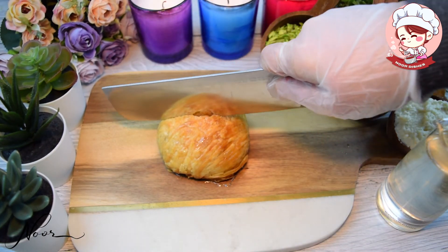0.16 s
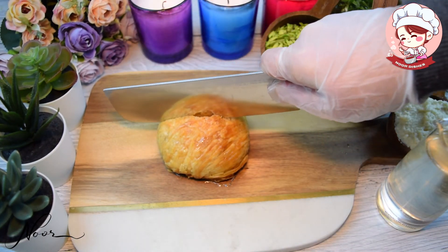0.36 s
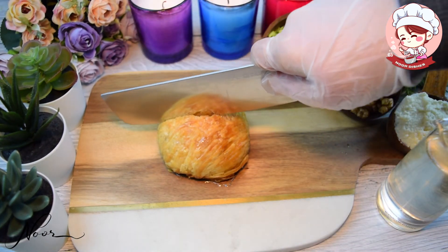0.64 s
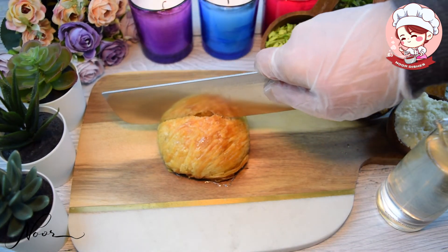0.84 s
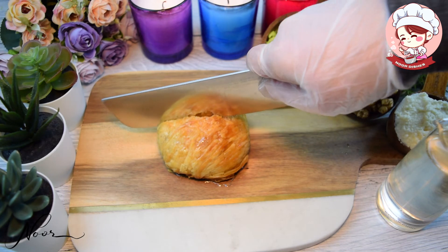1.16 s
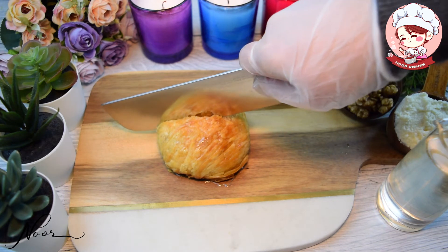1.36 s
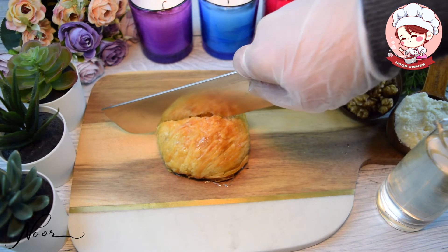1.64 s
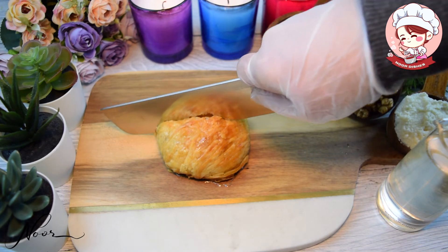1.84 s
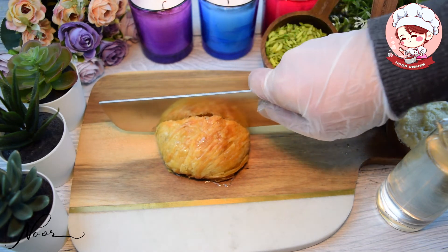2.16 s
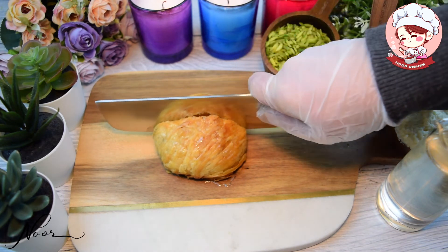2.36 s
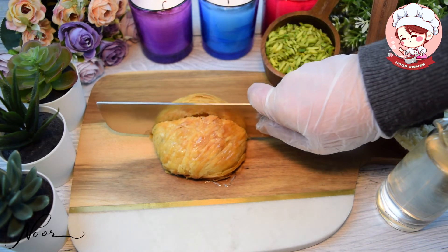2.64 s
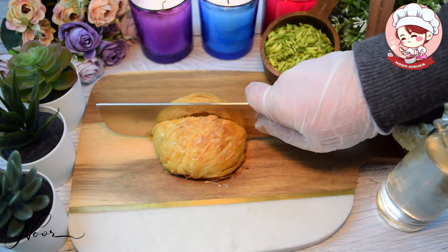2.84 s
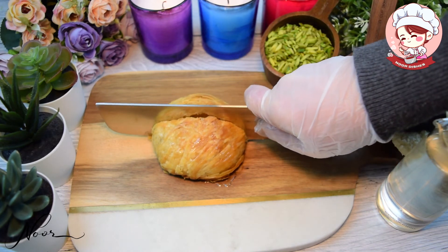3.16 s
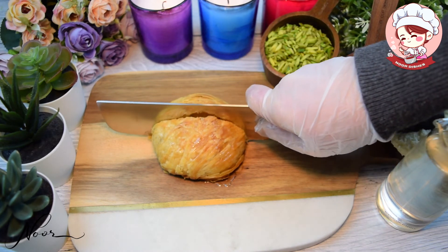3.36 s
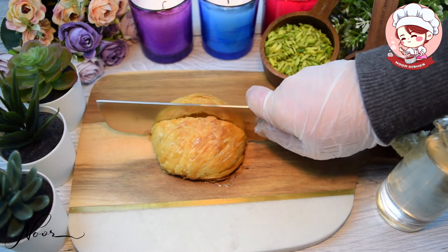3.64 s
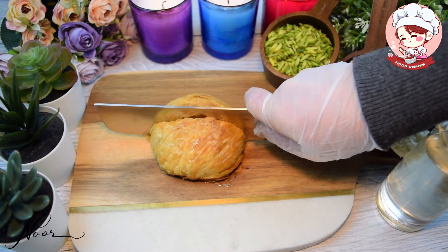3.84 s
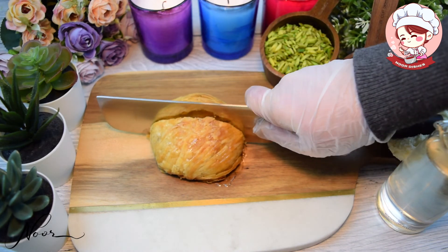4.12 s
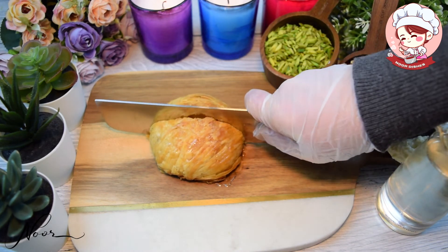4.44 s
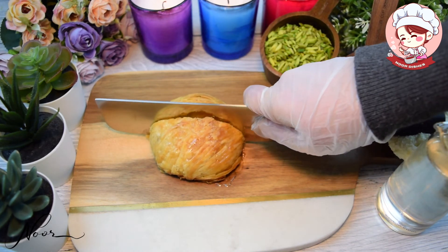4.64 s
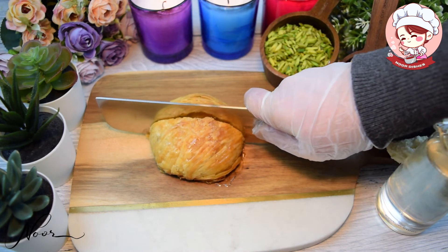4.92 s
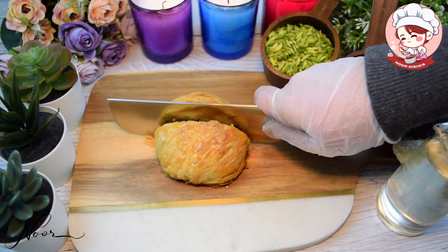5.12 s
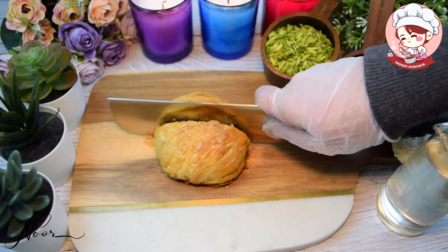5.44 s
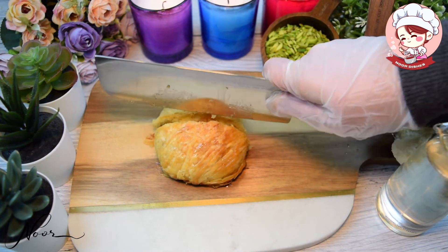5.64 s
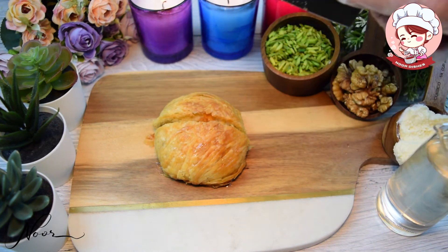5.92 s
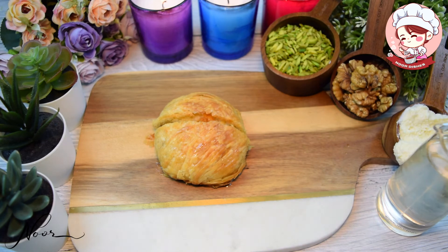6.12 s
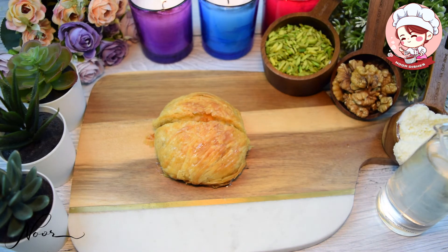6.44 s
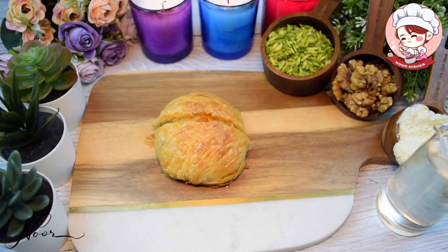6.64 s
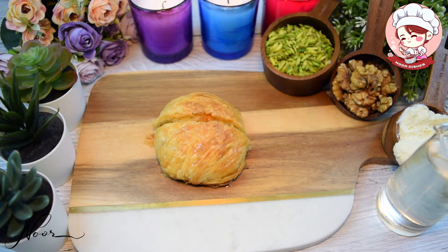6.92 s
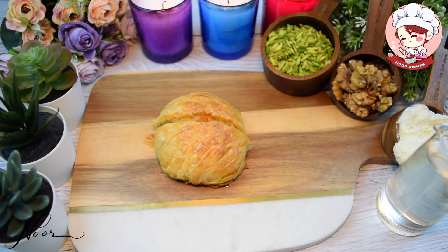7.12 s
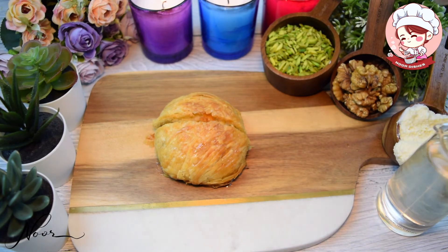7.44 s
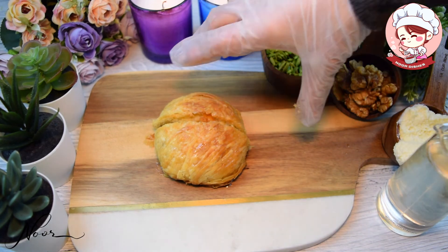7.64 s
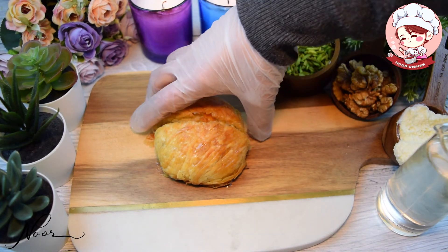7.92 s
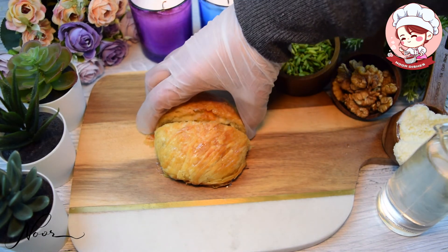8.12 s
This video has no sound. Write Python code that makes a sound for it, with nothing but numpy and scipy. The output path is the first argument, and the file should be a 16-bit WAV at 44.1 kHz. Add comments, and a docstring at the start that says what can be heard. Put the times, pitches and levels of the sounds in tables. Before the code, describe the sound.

Close up in a quiet kitchen, a blade works through flaky pastry: faint crackles grow into a dense crunch with sharp snaps, then soft rubbing through the filling. Several woody knocks hit the board, two of them strong. The knife is then set down with a loud thud and bright steel ring, followed by faint glove rustle and tiny crust ticks.

```python
"""A large knife is pressed through a flaky, nut-filled pastry on a wooden board in a quiet kitchen.
The crust crackles as clumped random fractures, single flakes snap as short noise cracks, and the blade
rubs through the filling as uneven coloured noise. Knocks on the board and the clink and thud of the knife
being laid down are sums of decaying modes; a gloved hand then brushes along as it takes hold of the pastry.
Room reflections, room tone, a faint hum and a thin high whine lie behind."""
import sys
import numpy as np
from scipy import signal
from scipy.fft import rfft, irfft, next_fast_len
from scipy.io import wavfile

SR = 44100
rng = np.random.default_rng(int(sys.argv[2]) if len(sys.argv) > 2 else 0)


def dump_mix(stems):
    """Bounce the given channels to the path in sys.argv[1] as a 16-bit WAV at rate SR."""
    frames = np.atleast_2d(stems).T  # one column per channel
    limited = np.clip(frames, -1, 1)  # hard clip at full scale
    pcm = np.round(limited * 32767).astype(np.int16)
    wavfile.write(sys.argv[1], SR, pcm)


N = 365148
TIME = np.arange(N) / SR


# pushes of the blade through the crust:
# (start [s], length [s], crackle of fine flakes [dB], crunch of coarse layers [dB])
CRUST_PUSHES = [(0.329, 0.089, -66.5, -74), (0.678, 0.26, -74, -70), (0.96, 0.34, -80.5, -100),
                (1.436, 0.36, -73, -70.5), (1.875, 0.1, -67, -59), (2.018, 0.074, -78, -60),
                (2.136, 0.14, -75.5, -64.5), (2.281, 0.11, -73, -58.5), (2.486, 0.062, -58.5, -54),
                (2.593, 0.047, -60.5, -51.5), (2.873, 0.01, -61, -58), (3.418, 0.0098, -90, -62.5),
                (3.663, 0.11, -76, -72), (4.02, 0.29, -89, -71), (4.557, 0.018, -90, -64.5),
                (4.94, 0.2, -79.5, -75.5), (5.567, 0.065, -68, -78), (5.766, 0.066, -94, -56)]
PUSH_ATTACK_S, PUSH_RELEASE_S = 0.017, 0.028   # time constants
RESTING_CRACKLE_DB = -84   # flakes giving way under the weight of the blade


def breaking():
    """Fracture follows load: the strengths of flaking and crunching swell, hold and let go with each push."""
    pushes = 0
    for start, length, fine_db, coarse_db in CRUST_PUSHES:
        strength = from_db([[fine_db], [coarse_db]])
        pushes = pushes + strength * swell(start, length, PUSH_ATTACK_S, PUSH_RELEASE_S)
    return pushes + from_db(RESTING_CRACKLE_DB) * in_pastry()


KNIFE_OUT_S, KNIFE_OUT_RELEASE_S = 5.91, 0.11   # the blade leaves the pastry; time constant


def in_pastry():
    """Contact condition: 1 while the blade is in the pastry, decaying exponentially as it is drawn out."""
    return np.exp(-np.maximum(TIME - KNIFE_OUT_S, 0) / KNIFE_OUT_RELEASE_S)


# stereo width of sounds on the board: (frequency [Hz], side minus mid [dB])
CLOSE_WIDTH = [(100, -56), (400, -21), (900, -23), (2000, -20), (4000, -19), (8000, -2.5), (15000, -7)]


def grains(spectrum, per_s, size_db, clump_db):
    """Crackling noise: a random train of microfractures of random size, in clumps; stereo, rms 1."""
    born = rng.random(N) < per_s / SR
    magnitude = np.minimum(rng.exponential(1, N), 4)
    sizes = born * from_db(size_db * magnitude + clump_db * drift(160))
    impulses = sizes * rng.choice([-1, 1], (2, N))
    return rms_one(stereo(*colour(impulses, spectrum), CLOSE_WIDTH))


# spectrum of the thin outer flakes: (frequency [Hz], relative level [dB])
FLAKE_COLOUR = [(1500, -4), (3500, 21), (4800, 15.5), (6500, 2.5), (10500, 13.5), (13000, 2), (15500, -4)]
# spectrum of the thicker layers: (frequency [Hz], relative level [dB])
CRUNCH_COLOUR = [(300, -28), (900, -2), (1900, 8.5), (2800, -6), (4200, -6), (6500, -14.5), (15000, -44)]
# spectrum of crunching felt through the board: (frequency [Hz], relative level [dB])
GRUMBLE_COLOUR = [(30, -50), (120, -18), (230, 0.5), (600, 4), (1100, 0.5), (2000, -19), (6000, -57)]
HARD_CRUNCH_DB = -54.5   # crunch level at which the pressure on the board counts as 1


def crust(flaking, crunching, uneven_db=2.0, board_db=-3.0):
    """Brittle fracture: flakes fizz and layers crunch; the board's grumble grows as the crunch squared."""
    fine = flaking * grains(FLAKE_COLOUR, per_s=7000, size_db=3.5, clump_db=4.5)
    coarse = crunching * grains(CRUNCH_COLOUR, per_s=4500, size_db=3.0, clump_db=2.5)
    pressure = crunching / from_db(HARD_CRUNCH_DB)
    grumble = grains(GRUMBLE_COLOUR, per_s=1700, size_db=2.5, clump_db=1.5)
    grumble = from_db(board_db) * pressure * crunching * grumble
    uneven_advance = from_db(uneven_db * drift(25.56))
    return uneven_advance * (fine + coarse + grumble)


# the loudest snaps of flakes and nuts, and small dry ticks:
# (time [s], level of the first 10 ms [dB], frequency about which the crack is band-limited [Hz])
LOUD_SNAPS = [(0.380, -63, 5300), (0.411, -71, 8000), (0.438, -67, 6000), (0.8071, -54.5, 6060),
              (0.842, -65, 8000), (0.886, -64, 11100), (0.999, -71, 6500), (1.045, -70, 7000),
              (1.149, -72, 8000), (1.179, -72, 8500), (1.556, -69, 7700), (1.67, -60, 5000),
              (1.755, -52, 4530), (1.826, -65, 4000), (1.855, -60, 4000), (1.922, -59, 4520),
              (1.956, -59, 4200), (2.0263, -62, 3000), (2.0353, -58, 3600), (2.189, -78, 6000),
              (2.205, -57, 3980), (2.232, -58, 4900), (2.2692, -60, 3400), (2.2837, -51.5, 2800),
              (2.3414, -66, 6500), (2.392, -60, 4080), (2.463, -57, 3020), (2.540, -54, 3470),
              (2.554, -43.5, 3150), (2.6444, -63, 3560), (2.692, -48, 2350), (3.0575, -58.5, 4360),
              (3.419, -65, 3500), (3.462, -50, 2800), (3.4885, -74, 3800), (3.728, -65, 2960),
              (3.916, -69, 8400), (4.06, -63, 5900), (4.221, -69, 6000), (4.283, -62, 7800),
              (4.7125, -42, 2830), (5.131, -65, 9900), (5.658, -52.5, 3300), (5.799, -50, 3170),
              (6.381, -68, 3500), (6.508, -50.5, 3700), (6.929, -56, 4630), (7.169, -46.5, 4830),
              (7.208, -56.5, 8000), (8.161, -60, 5090), (8.213, -61.5, 8000), (8.267, -61, 5980)]
CRUST_THROUGH_S = 2.66   # until now the edge is in the dry outer crust, whose snaps are the brightest


def snaps(flaking, front=2.8, front_t60=0.0026, splinter_t60=0.051, edge_db=-21, edge_hz=6500):
    """Impulsive fracture: a crack band-limited about its own pitch, then a tail of tiny splinters."""
    out, t = np.zeros(N), TIME[:SR // 12]
    envelope = front * fade(t, front_t60) + fade(t, splinter_t60)
    for s, level_db, pitch_hz in LOUD_SNAPS + small_snaps(flaking):
        crack, edge = rng.standard_normal((2, len(t))) * envelope
        crack = cut(crack, [pitch_hz * 0.5, pitch_hz * 1.16], "band", order=1)
        crack = cut(crack, pitch_hz, "low", order=1)
        bright_edge = (s < CRUST_THROUGH_S) * from_db(edge_db) * cut(edge, edge_hz, "high")
        add(out, s, level_db, crack + bright_edge)
    return out


SMALL_SNAP_DB = 1   # mean level of single flakes above the flaking strength


def small_snaps(flaking, count=80, spread_db=7, low_hz=3500, high_hz=9500):
    """Random fracture times, louder under harder pushes: rows of (time [s], level [dB], pitch [Hz])."""
    when, loudness, pitch = rng.random((count, 3)).T
    s = when * FILLING_DRAG[-1][0]   # up to the last point of the drag curve
    flaking_db = 20 * np.log10(np.interp(s, TIME, flaking))
    level_db = flaking_db + SMALL_SNAP_DB + spread_db * (loudness - .5)
    return list(zip(s, level_db, low_hz * (high_hz / low_hz) ** pitch))


# drag of the blade in the filling: (time [s], level before the overall gain of the rub [dB])
FILLING_DRAG = [(0.0, -65.5), (0.75, -61), (1.28, -63.5), (1.74, -59.5), (2.42, -65), (2.67, -60),
                (3.09, -58.5), (4.82, -58), (5.32, -67), (5.6, -60)]
# spectrum of the rubbing: (frequency [Hz], relative level [dB])
RUB_COLOUR = [(100, -16.5), (190, 0.5), (300, -5), (450, 3), (650, -3), (900, 7), (1100, 1.5), (1500, -0.5),
              (2100, -12.5), (3000, -40), (8000, -82)]
STICK_DB = 1.1   # unevenness of the drag, rms


def rub(gain_db=-3.5):
    """Friction noise: the flat of the blade drags unevenly through the soft filling."""
    drag_db = in_time(FILLING_DRAG)[0] + STICK_DB * drift(45)
    return in_pastry() * from_db(gain_db + drag_db) * hiss(RUB_COLOUR, CLOSE_WIDTH)


# knocks on the board, and nuts breaking against it at 2.675 and 2.694 s: (time [s], level of the first 10 ms
# [dB], # upper corner, lower for soft contacts [Hz], lower corner [Hz], pitch of the first swings [Hz])
BOARD_KNOCKS = [(0.380, -55, 1510, 200, 940), (0.404, -54.5, 1190, 199, 930),
                (2.675, -47.5, 2900, 300, 710), (2.694, -45, 3260, 400, 1330),
                (2.7810, -33.5, 2130, 280, 1350), (3.1005, -43, 3660, 340, 2190),
                (3.148, -41.5, 1540, 250, 880), (3.462, -46.5, 2400, 700, 1400),
                (3.4880, -47.5, 2620, 700, 1300), (3.5186, -34, 1970, 260, 1180),
                (4.7084, -22.5, 2060, 323, 1330), (5.119, -46, 1070, 350, 890),
                (5.157, -53, 1200, 350, 780), (5.272, -55, 2000, 1100, 1400), (5.568, -58, 2800, 900, 2000),
                (5.657, -26.5, 1970, 280, 1000), (5.7988, -34, 2180, 288, 880),
                (5.8014, -33.5, 1920, 290, 1190), (8.098, -52.5, 1440, 1510, 1390)]
# modes of the wooden board: (frequency [Hz], relative level [dB], t60 [s])
BOARD_MODES = [(197, -17.5, 0.22), (300, -4, 0.035), (432.4, 0, 0.061), (568, -6.5, 0.06),
               (677, -13.5, 0.057), (765, 8.5, 0.018), (856, -8, 0.036), (1055, 0, 0.083),
               (1170, -16, 0.043), (1276, 0.5, 0.071), (1528, -3.5, 0.042), (1787, 1.5, 0.052),
               (2020, -13.5, 0.075), (2180, -15, 0.03), (2695, -5.5, 0.025)]


def knocks():
    """Modal excitation of a plate: each knock sets the wooden board ringing briefly."""
    return blows(BOARD_KNOCKS, BOARD_MODES, thud_db=18.5, thud_span=0.0235, front_db=18.5, front_t60=0.0053)


def blows(table, modes, thud_db, thud_span, front_db, front_t60):
    """Impact: hard first swings, ringing modes and a dense, damped burst; soft contacts are dull."""
    out, t = np.zeros(N), TIME[:SR // 4]
    for s, level_db, soft_hz, low_hz, front_hz in table:
        front = from_db(front_db) * fade(t, front_t60) * np.cos(2 * np.pi * front_hz * t)
        ring = struck(modes, t, vary_db=2.0)
        thud = from_db(thud_db) * cut(burst(t, thud_span), [550, 2500], "band", order=1)
        hit = cut(front + ring + thud, soft_hz, "low", order=3)
        add(out, s, level_db, cut(hit, low_hz, "high", order=1))
    return out


# touches that set the blade ringing: (time [s], level of the first 10 ms [dB], lower corner [Hz],
# upper corner [Hz], ring time as a share of the free one [1], clack gain [dB], singing tone [dB])
BLADE_TOUCHES = [(3.462, -46.5, 3300, 4300, 0.23, 0, -73), (5.5195, -52.5, 5500, 10500, 0.31, -3, -64),
                 (5.595, -54, 8500, 11500, 0.69, -18, -65), (6.7782, -39, 1600, 4196, 0.4, 12, -60),
                 (6.7835, -44, 3400, 6500, 0.9, 8.5, -67.5), (7.078, -23.5, 1900, 4860, 1.07, 8, -40.5),
                 (7.113, -37, 2406, 5800, 0.41, 6.5, -60.5)]
# modes of the steel blade: (frequency [Hz], relative level [dB], free t60 [s])
BLADE_MODES = [(2640, -12, .1), (3370, -12, 0.088), (3440, 9, 0.068), (3660, -0.5, 0.18), (3570, 4.5, .11),
               (3660, 2.5, 0.066), (3838, -6, 0.15), (4280, -7, .15), (4820, -2.5, 0.06), (5160, -12, .2),
               (5400, -7.5, .06), (6350, -19.5, .15), (6410, -16, 0.16), (7250, -25, 0.13),
               (8200, -8, .085), (9800, -9, 0.082), (10450, -9.5, 0.049), (11700, -15, .06),
               (12740, -19, .06)]
SING_HZ, SING_T60 = 3617, 0.43   # the blade's freest mode, which sings on after each touch; Hz, s
SING_BEAT_HZ, SING_TWIN_DB = 5.2, -14.5   # a weaker twin mode just above makes the tone throb
# bright sizzle of the steel edge: dB against the touch, span s, lower corner Hz
CONTACT_DB, CONTACT_SPAN_S, CONTACT_HZ = -25, 0.077, 6970


def blade(clack_span=0.06, clack_top_hz=9000):
    """Damped modes and beating: steel clacks and rings, damped by hand and counter; one tone throbs on."""
    out, t = np.zeros(N), TIME[:SR // 2]
    twin = from_db(SING_TWIN_DB) * np.sin(2 * np.pi * (SING_HZ + SING_BEAT_HZ) * t)
    sing = fade(t, SING_T60) * (np.sin(2 * np.pi * SING_HZ * t) + twin)
    for s, level_db, low_hz, high_hz, freedom, clack_db, sing_db in BLADE_TOUCHES:
        ring = struck(np.array(BLADE_MODES) * [1, 1, freedom], t, vary_db=.8)
        clack = from_db(clack_db) * cut(burst(t, clack_span), [1300, clack_top_hz], "band")
        touch = cut(ring + clack, low_hz, "high", order=3)
        add(out, s, level_db, cut(touch, high_hz, "low"))
        sizzle = cut(burst(t, CONTACT_SPAN_S), CONTACT_HZ, "high")
        add(out, s, level_db + CONTACT_DB, sizzle)
        add(out, s, sing_db, sing)
    return out


# knife set down on the counter: (time [s], level of the first 10 ms [dB],
# upper corner, lower for soft contacts [Hz], lower corner [Hz], pitch of the first swings [Hz])
COUNTER_BLOWS = [(6.913, -47, 2340, 198.4, 1500), (6.929, -53.5, 1360, 148.5, 1000),
                 (6.956, -52, 1400, 204, 700), (7.0760, -20.5, 1200, 400, 603),
                 (7.0785, -18, 1900, 560, 1116), (7.113, -35, 1700, 250, 997),
                 (7.337, -51, 1370, 910, 1060), (7.411, -56.5, 2770, 1510, 2380)]
# modes of the counter top: (frequency [Hz], relative level [dB], t60 [s])
COUNTER_MODES = [(112.6, -27.5, 0.15), (201, -7, 0.26), (430, -4, 0.067), (525, -13, 0.059),
                 (651, -2.5, 0.068), (673, -2, 0.07), (859, 2, 0.045), (1083, -0.5, 0.11),
                 (1190, -7, 0.073), (1565, -3.5, 0.088), (1783, -9, 0.07), (2420, -21.5, 0.027)]


def set_down():
    """Modal excitation of a plate: the knife lands on the counter with a thud."""
    thuds = blows(COUNTER_BLOWS, COUNTER_MODES, thud_db=18.0, thud_span=0.04, front_db=13.0, front_t60=0.0092)
    return thuds + thump()


def thump(level_db=-59, t60=0.27, tone_hz=110):
    """Momentum transfer: the weight of the knife shakes the counter at the loudest blow."""
    out, t = np.zeros(N), TIME[:SR // 2]
    landing_s = max(COUNTER_BLOWS, key=lambda row: row[1])[0]
    push = fade(t, t60 / 10)
    shake = fade(t, t60) * np.sin(2 * np.pi * tone_hz * t) / 2
    add(out, landing_s, level_db, cut(push + shake, 25, "high", order=1))
    return out


# movements of the gloved hand: (start [s], length [s], level [dB])
HAND_MOVES = [(6.2, 0.012, -66.5), (6.332, 0.044, -67), (6.53, 0.0088, -82), (6.8, 0.031, -61),
              (7.06, 0.017, -56.5), (7.37, 0.15, -67.5), (7.883, 0.11, -63.5), (8.14, 0.23, -67)]
# spectrum of the glove: (frequency [Hz], relative level [dB])
GLOVE_COLOUR = [(300, -17), (1200, -0.5), (2200, -5), (3200, -5), (4500, -4), (7000, -13), (10000, -15.5),
                (15500, -28)]
# stereo width of diffuse sound: (frequency [Hz], side minus mid [dB])
ROOM_WIDTH = [(100, -20.5), (250, -10.5), (600, -5.5), (3000, -4), (15000, -2)]
MOVE_ATTACK_S, MOVE_RELEASE_S = 0.026, 0.13   # time constants


def glove(crinkle_db=3.0):
    """Friction noise: thin plastic and wool brush along as the hand moves."""
    motion = 0
    for start, length, level_db in HAND_MOVES:
        motion = motion + from_db(level_db) * swell(start, length, MOVE_ATTACK_S, MOVE_RELEASE_S)
    return motion * from_db(crinkle_db * drift(42)) * hiss(GLOVE_COLOUR, ROOM_WIDTH)


# reverberation time of the tail: (frequency [Hz], t60 [s])
ROOM_T60 = [(120, 0.37), (300, 0.62), (600, 0.44), (1100, 0.47), (2300, 0.43), (6000, 0.24), (14000, 0.14)]
# spectrum of the tail: (frequency [Hz], gain [dB])
ROOM_COLOUR = [(60, -1.5), (115, 12.5), (155, 3), (200, 8), (300, -1), (430, -3.5), (600, 1.5),
               (1000, -2.5), (2000, -3.5), (4000, 0.5), (14000, 4)]
# low standing waves: (frequency [Hz], level [dB], t60 [s])
ROOM_MODES = [(112, -52, 0.37), (209, -65, 0.23)]
NEAR_DB = -7.5   # reflections from the things on the counter


def kitchen(x, width, near_span=0.043, tail_db=-8.5, build_s=0.0032):
    """Reverberation: quick reflections from the counter, a diffuse tail and two low standing waves."""
    t, edges = TIME[:SR * 3 // 4], np.geomspace(50, 18000, 10)
    tail = 0
    for low, high in zip(edges, edges[1:]):
        band = cut(rng.standard_normal((2, len(t))), [low, high], "band")
        tail = tail + band * fade(t, at_hz(ROOM_T60, np.sqrt(low * high)))
    tail = colour(tail, ROOM_COLOUR) * (1 - np.exp(-t / build_s))   # the tail builds up gradually
    tail = tail / np.linalg.norm(fade(t, 0.29))
    near = np.array([burst(t, near_span), burst(t, near_span)]) * (t > .0015)
    near = near / np.linalg.norm(near[0])
    mid, side = from_db(tail_db) * tail + from_db(NEAR_DB) * near
    standing = sum(from_db(db) * fade(t, t60) * np.sin(2 * np.pi * hz * t) for hz, db, t60 in ROOM_MODES)
    end_fade = np.minimum(1, 10 * (1 - t / t[-1]))
    echoes = stereo(mid + standing, side, width) * end_fade
    return signal.fftconvolve(x[None], echoes, axes=-1)[:, :N]


# a faint low hum comes and goes: (start [s], length [s], mean pitch [Hz], level [dB])
HUMS = [(0, 0.02, 123, -72.5), (0.633, 0.37, 138, -70), (1.09, 0.14, 113.2, -73), (2.163, 0.26, 109.5, -74),
        (5.045, 0.6, 116.2, -74)]
HUM_ATTACK_S, HUM_RELEASE_S = 0.044, 0.15   # time constants


def hum(waver_hz=2.15):
    """Frequency modulation: a low tone comes and goes, wavering randomly in pitch."""
    waver = waver_hz * drift(17.0)
    tones = 0
    for start, length, hz, level_db in HUMS:
        tone = np.sin(2 * np.pi * np.cumsum(hz + waver) / SR)
        tones = tones + from_db(level_db) * swell(start, length, HUM_ATTACK_S, HUM_RELEASE_S) * tone
    return np.sqrt(2) * tones   # a sine of rms 1


# spectrum of the room tone: (frequency [Hz], relative level [dB])
AIR_COLOUR = [(25, -35), (60, -13), (85, -18), (115, 5), (150, -6.5), (200, -0.5), (320, -2.5), (600, -4),
              (1100, -3), (1600, -4), (2500, -7), (4000, -12.5), (8000, -21), (15500, -29.5)]
WHINE_HZ, WHINE_DB = 8130, -87.5   # mean pitch, rms level


def background(air_db=-66.5):
    """Stationary noise floor: room tone and a thin, unsteady high whine, with the wavering hum."""
    whine = np.sqrt(2) * np.sin(2 * np.pi * np.cumsum(WHINE_HZ + 70 * drift(400)) / SR)
    return from_db(air_db) * hiss(AIR_COLOUR, ROOM_WIDTH) + hum() + from_db(WHINE_DB) * whine


def hiss(spectrum, width):
    """Filtered Gaussian noise: smooth stereo noise of a given colour; rms 1."""
    return rms_one(stereo(*colour(rng.standard_normal((2, N)), spectrum), width))


def struck(modes, t, vary_db):
    """Modal superposition: alternating signs, and random strengths for where the blow lands."""
    hz, db, t60 = np.transpose(modes)[:, :, None]
    sign = (-1) ** np.arange(len(hz))[:, None]
    strength = sign * from_db(db + vary_db * rng.standard_normal(hz.shape))
    return np.sum(strength * fade(t, t60) * np.sin(2 * np.pi * hz * t), axis=0)


def burst(t, span):
    """Flat-spectrum transient: a dying noise burst with its energy spread nearly evenly over frequency."""
    noise = rng.standard_normal(len(t)) * fade(t, span)
    for _ in range(4):   # flatten the spectrum, then confine the burst in time again
        flat = irfft(np.exp(1j * np.angle(rfft(noise))), len(t))
        noise = flat * np.exp(-(2 * t / span) ** 2)
    return noise * np.linalg.norm(fade(t, span)) / np.linalg.norm(noise)


def swell(start, length, attack_s, release_s):
    """Exponential envelope: rises to 1 at the start, holds and dies away."""
    early, late = np.maximum(start - TIME, 0), np.maximum(TIME - start - length, 0)
    return np.exp(-np.minimum(early / attack_s + late / release_s, 20))


def fade(t, t60):
    """Exponential decay by 60 dB in t60."""
    return np.exp(-np.log(1000) * t / t60)


def drift(rate):
    """Slow random modulation: chance values at a rate per second, joined by lines; rms 1."""
    knots = rng.standard_normal(4096)
    return rms_one(np.interp(TIME * rate, np.arange(len(knots)), knots))


def add(out, s, level_db, hit):
    """Superposition: place a hit so that its first 10 ms have the given rms level."""
    start = round(s * SR)
    hit = hit * from_db(level_db) / np.sqrt(np.mean(hit[:SR // 100] ** 2))
    out[start:start + len(hit)] += hit[:N - start]


def colour(x, spectrum):
    """Linear filtering by multiplication with a smooth spectrum."""
    size = x.shape[-1]
    padded = next_fast_len(size)
    gain = from_db(at_hz(spectrum, np.fft.rfftfreq(padded, 1 / SR)))
    return irfft(rfft(x, padded) * gain, padded)[..., :size]


def cut(x, hz, kind, order=2):
    """Butterworth filtering: a maximally flat pass band."""
    sections = signal.butter(order, np.clip(hz, 10, .45 * SR), kind, fs=SR, output="sos")
    return signal.sosfilt(sections, x)


def at_hz(points, hz):
    """Interpolate a spectrum on a logarithmic frequency axis."""
    f, value = np.transpose(points)
    return np.interp(np.log(np.maximum(hz, 1)), np.log(f), value)


def in_time(rows):
    """Interpolate the columns of a curve linearly in time."""
    s, *columns = np.transpose(rows)
    return [np.interp(TIME, s, c) for c in columns]


def stereo(mid, side, width):
    """Mid-side coding: the side signal is weighted by the width, then added left and subtracted right."""
    return mid + colour(side, width) * np.array([[1], [-1]])


def pan(x, left_db):
    """Level difference: raise the left channel and lower the right by left_db each."""
    return x * from_db([[left_db], [-left_db]])


def rms_one(x):
    """Normalise to rms 1."""
    return x / np.sqrt(np.mean(x ** 2) + 1e-20)


def from_db(db):
    """Convert decibels to an amplitude ratio."""
    return 10 ** (np.asarray(db) / 20)


# stereo width of reflections of sounds off to the side: (frequency [Hz], side minus mid [dB])
COUNTER_WIDTH = [(100, -24.5), (400, -23.5), (900, -17.5), (2000, -17.5), (4000, -10.5), (8000, 1),
                 (15000, 0)]
STEEL_ROOM_DB = -6   # steel's share in the room sound: the ring is heard mostly direct, with little reverberation


def scene():
    """Superposition of direct and reflected sound, all slightly left of centre."""
    flaking, crunching = breaking()
    board = knocks() + snaps(flaking)
    counter = set_down()
    steel = blade()
    room = kitchen(board, CLOSE_WIDTH)
    room = room + kitchen(counter + from_db(STEEL_ROOM_DB) * steel, COUNTER_WIDTH)
    cutting = board + crust(flaking, crunching) + rub()
    surroundings = room + glove() + background()
    direct = pan(cutting, left_db=0.43) + pan(counter, left_db=0.5) + pan(steel, left_db=0.8)
    return direct + pan(surroundings, left_db=0.24)


def record(dry):
    """Elliptic low-pass filtering: the top is cut steeply above 15.9 kHz."""
    return signal.sosfilt(signal.ellip(10, .1, 70, 15900, fs=SR, output="sos"), dry)


dry = scene()
out = record(dry)
dump_mix(out)
```